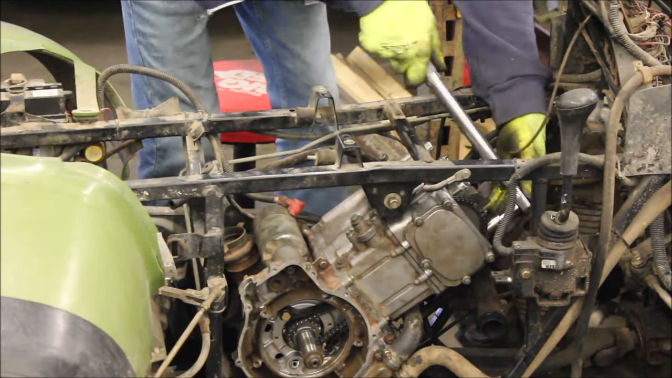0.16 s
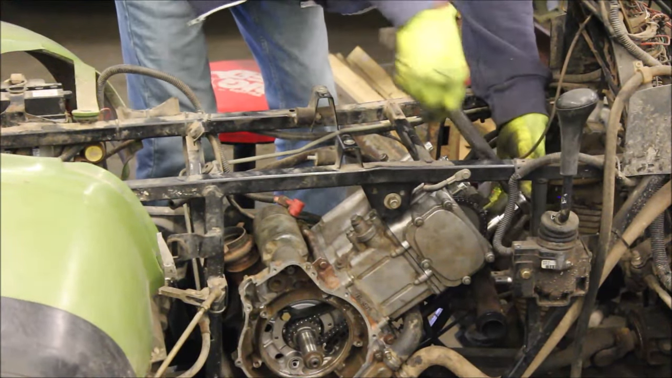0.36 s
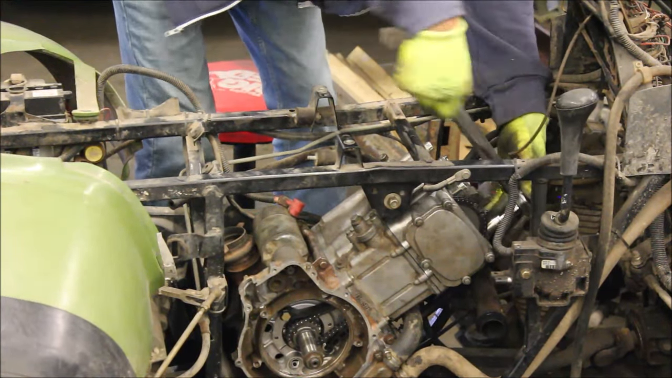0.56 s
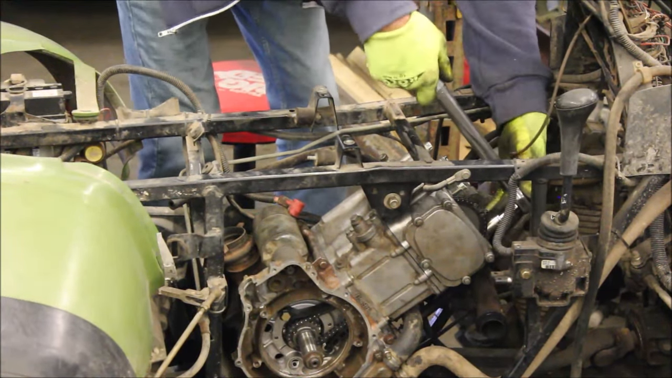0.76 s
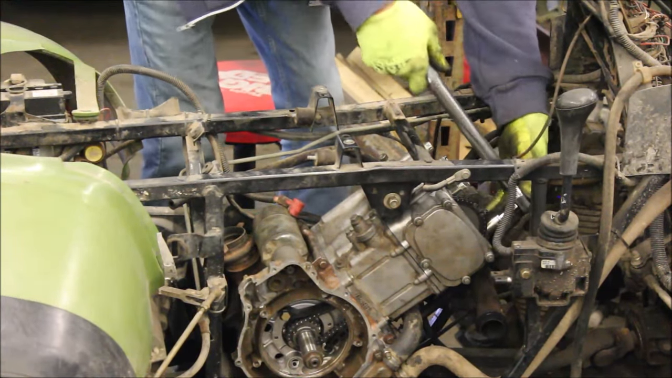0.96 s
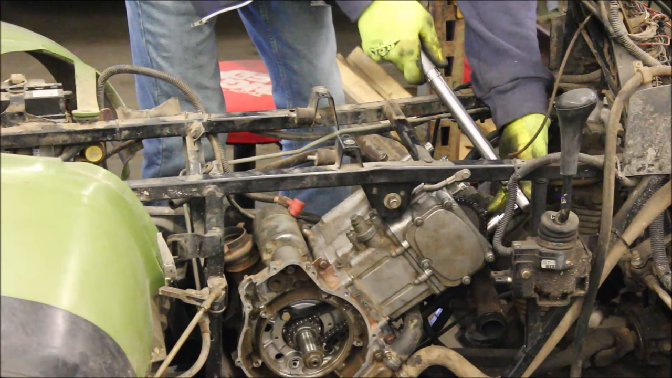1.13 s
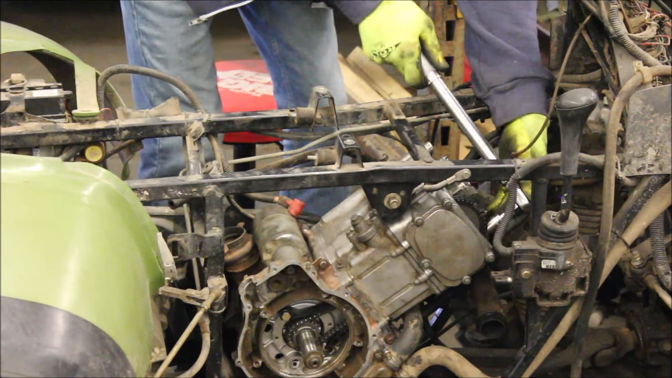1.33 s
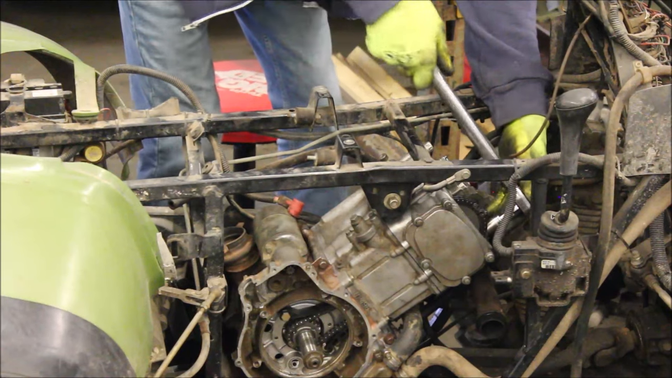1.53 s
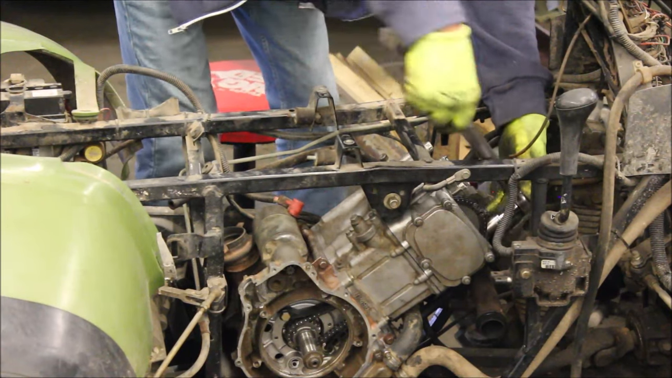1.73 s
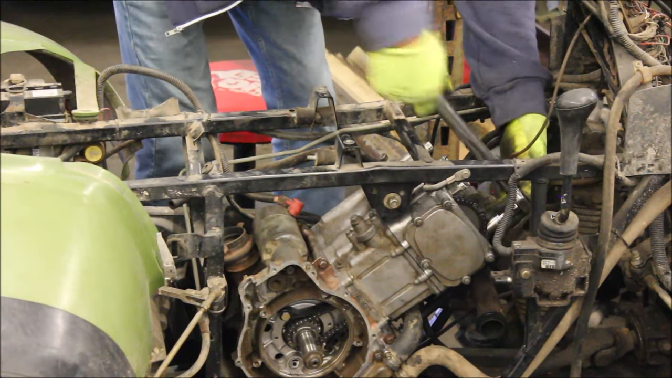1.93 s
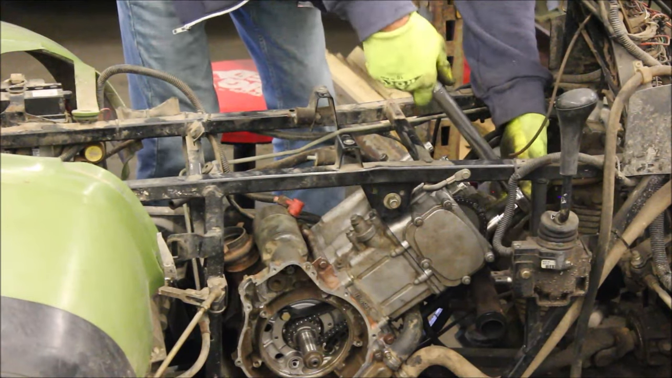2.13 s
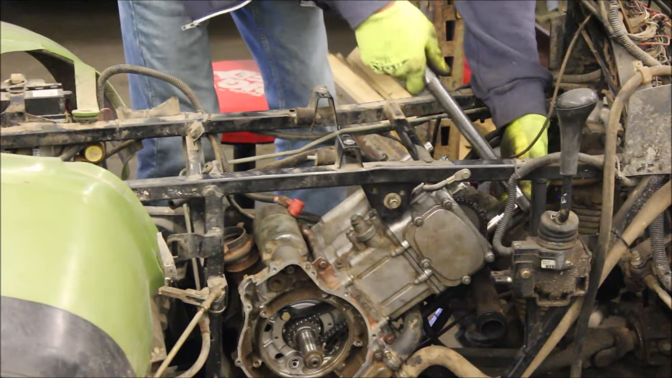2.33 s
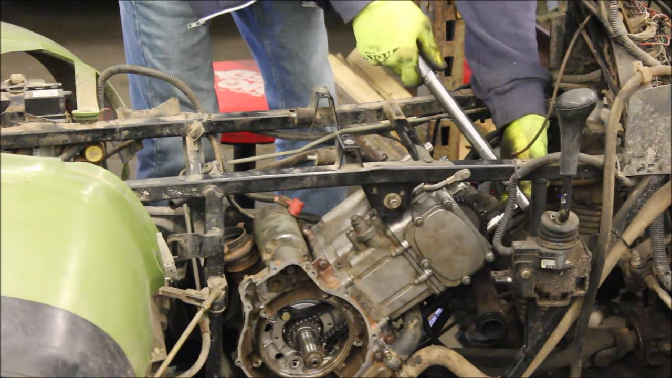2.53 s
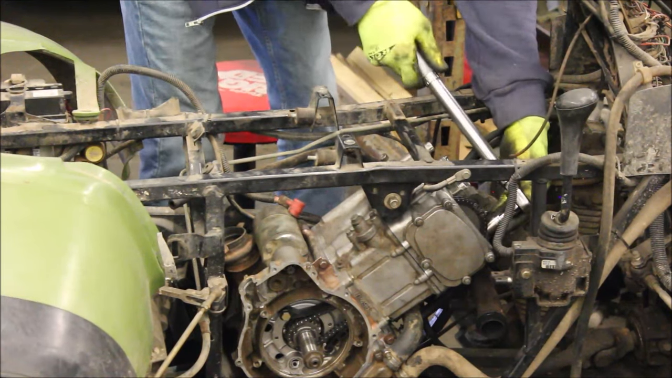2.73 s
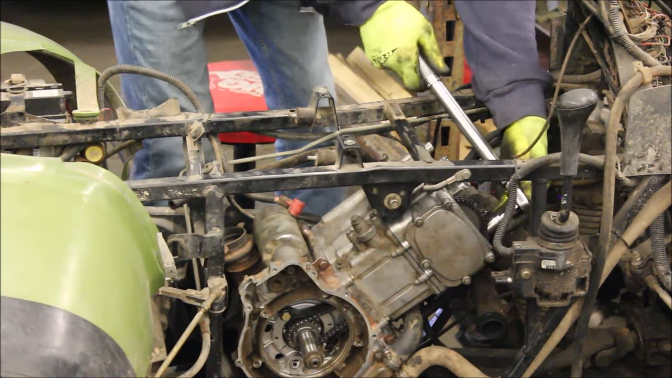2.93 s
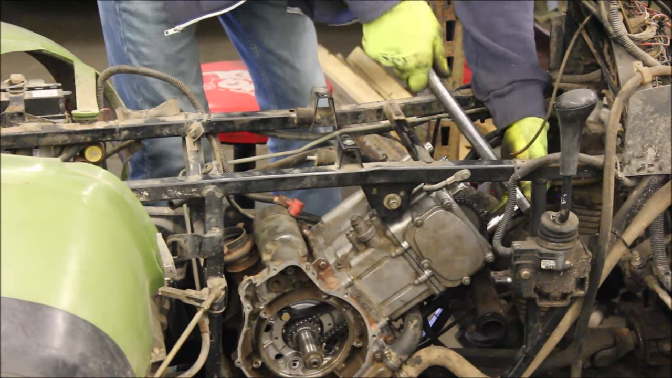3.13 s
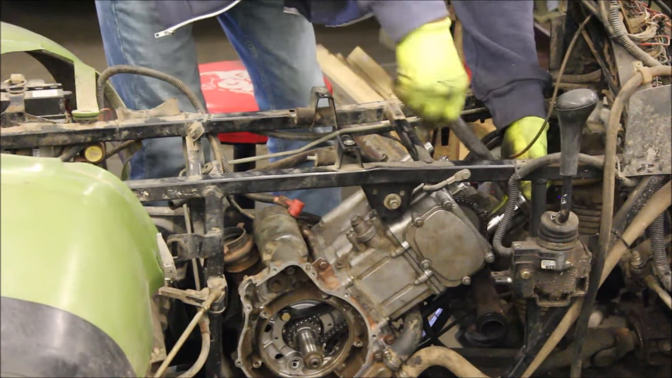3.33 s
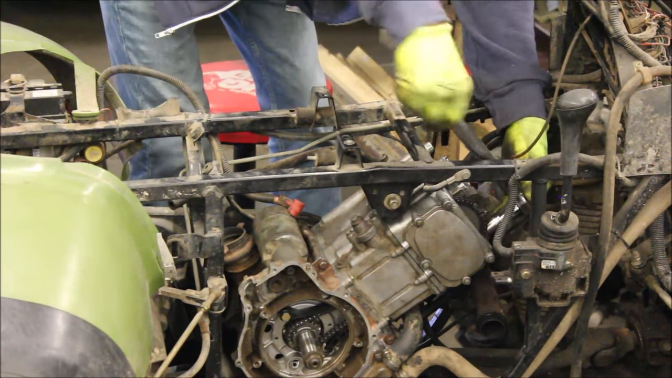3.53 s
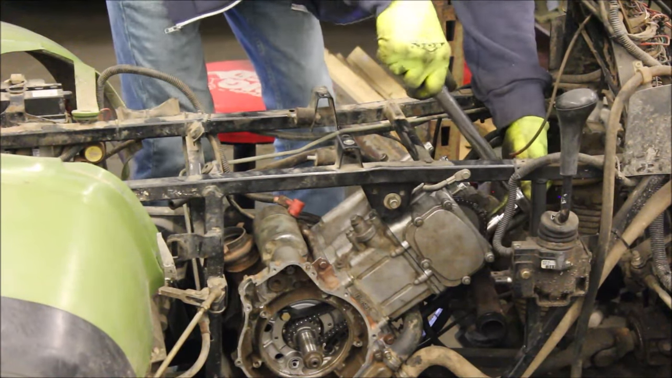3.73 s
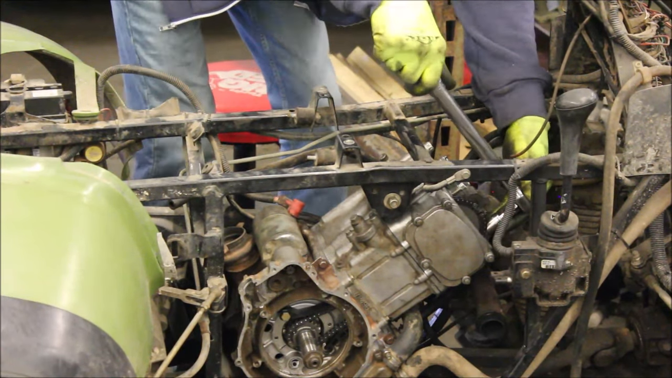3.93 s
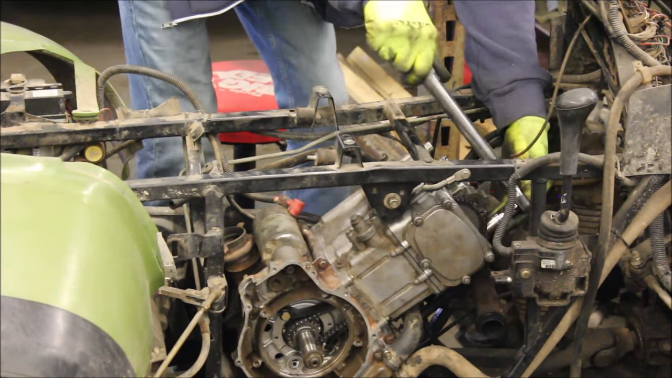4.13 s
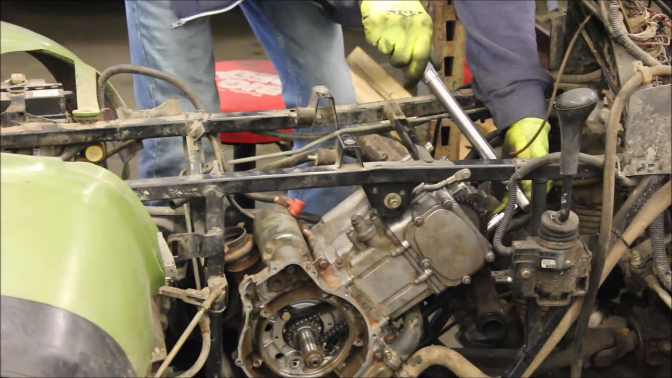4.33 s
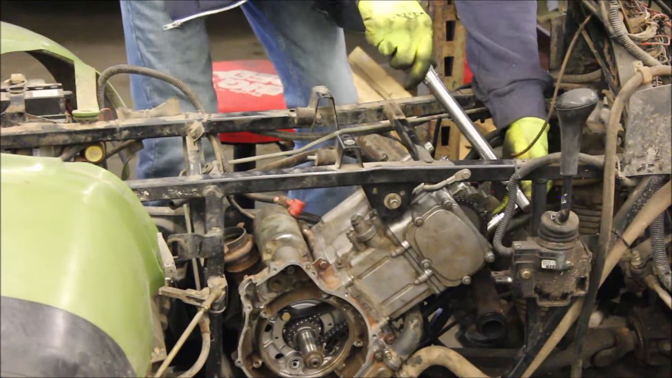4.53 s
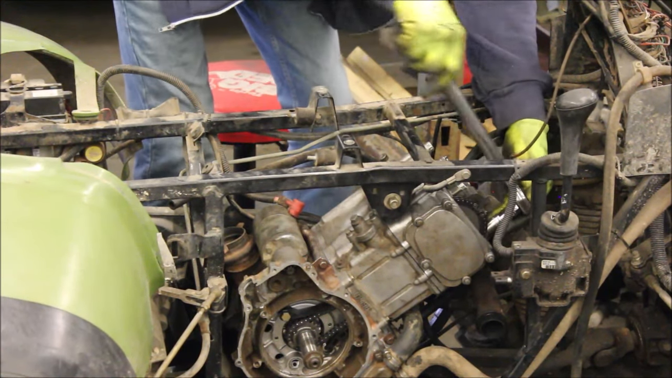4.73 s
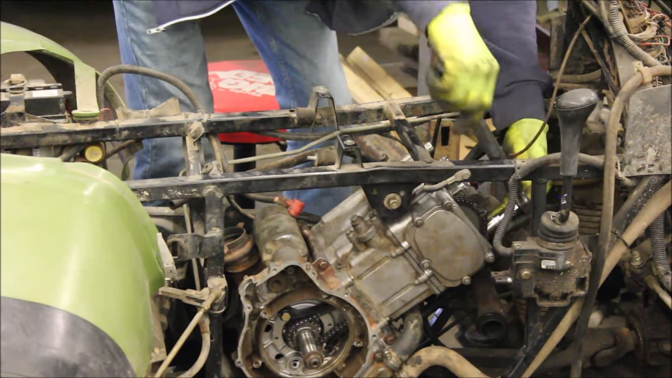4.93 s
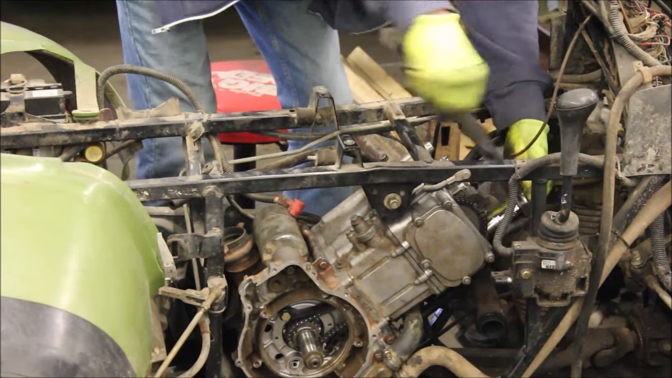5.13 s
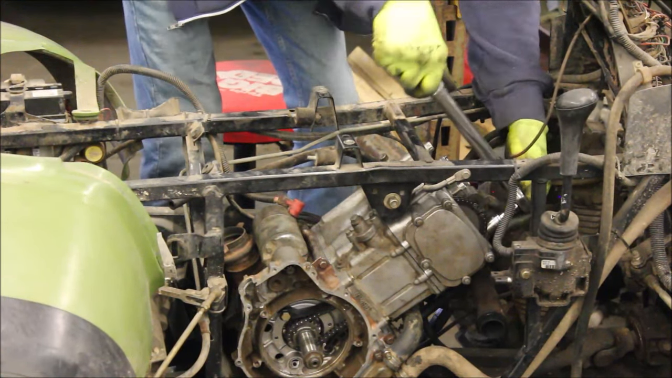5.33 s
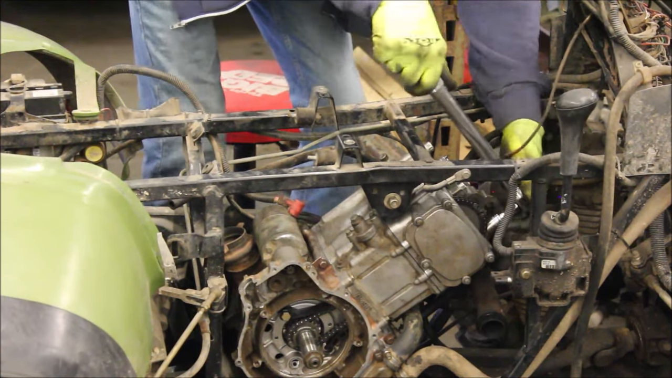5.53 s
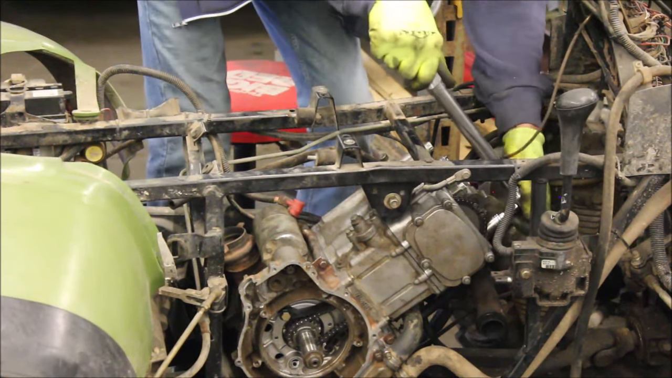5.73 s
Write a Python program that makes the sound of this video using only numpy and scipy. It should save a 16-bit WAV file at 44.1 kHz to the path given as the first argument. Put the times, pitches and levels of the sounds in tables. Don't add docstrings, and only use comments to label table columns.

```python
import sys
import numpy as np
from scipy import signal
from scipy.fft import rfft, irfft
from scipy.io import wavfile
from scipy.ndimage import uniform_filter1d

SR = 44100
rng = np.random.default_rng(int(sys.argv[2]) if len(sys.argv) > 2 else 0)


def level_to_linear(level):
    exponent = np.asarray(level, float) / 20
    return 10 ** exponent


def bounce(signal):
    frames = np.transpose(np.atleast_2d(signal))
    limited = np.clip(frames, -1, 1)
    pcm = np.round(limited * 32767).astype(np.int16)
    wavfile.write(sys.argv[1], SR, pcm)


N = 258867

# freq_hz, level_db, t60_s
SOCKET_MODES = [(835, -7.5, 0.041), (1416, 7, 0.04), (1705, 1.5, 0.043), (2510, -2, 0.087),
                (2770, -3, 0.062), (3740, 8, 0.0063), (5000, -8, 0.033), (10100, -8.5, 0.026)]


def break_over():
    # ring_hz, ring_hz
    blows = [
        (.4671, -2.5, -27, 1560, 868),
        (1.7858, -4.5, -26.5, 2260, 1254),
        (3.4655, -5.5, -27, 1800, 1123),
        (5.0132, -5, -28.5, 1840, 1142),
    ]
    # freq_hz, level_db, t60_s
    modes = [(230.3, -1.5, 0.15), (341, -2.5, 0.3), (392.6, 7, 0.22), (497.7, -2.5, 0.15), (704, 4, 0.17),
             (1170, 8.5, 0.028), (1740, -19, 0.046), (2280, 4.5, 0.02), (2650, -13, 0.093),
             (3400, -5, 0.16), (3770, -2.5, 0.082), (4950, -8, 0.056), (7550, -7.5, 0.027)]
    # freq_hz, density_db (per Hz)
    crack = [(40, -69), (100, -15.5), (180, -13), (290, -6), (600, -6), (880, -10.5), (1360, -9),
             (1950, -0.5), (3300, -9.5), (4300, -15.5), (5650, -23), (10200, -31), (13500, -43),
             (16000, -66)]
    return strikes(blows, modes, crack, ring_db=-2.5, own_db=2.0, own_t60=0.087,
                   rise_s=0.013, rush_s=0.032, slack_db=-31, lead_s=0.001071)


def ratchet():
    # start_s, peak_db, treble_minus_body_db, ring_hz, ring_hz
    ticks = [(0.2708, -22, -13, 3740, 7050), (0.3081, -24.5, -15, 3700, 4940),
             (0.3491, -25, -13, 3740, 5170), (0.4048, -26, -13, 3100, 7100), (0.453, -26, -7, 1950, 5340),
             (1.5989, -24, -15.5, 4380, 6700), (1.6416, -23.5, -18.5, 3640, 6200),
             (1.6806, -23.5, -3, 4080, 6650), (1.727, -24, -13, 4340, 5000), (1.7754, -25, -2, 2250, 4600),
             (3.2096, -22.5, -8.5, 3800, 4600), (3.259, -24, -11.5, 2730, 4570),
             (3.3118, -24.5, -5.5, 2730, 4660), (3.3699, -22, -5.5, 2590, 6700),
             (4.8367, -25.5, -13.5, 2900, 7350), (4.8997, -26.5, -15.5, 3140, 6470),
             (4.9835, -25.5, -21, 2650, 4440)]
    # freq_hz, level_db, t60_s
    modes = [(7070, 3, 0.0074), (10300, 1, .006), (11860, -20, 0.005)]
    # freq_hz, density_db (per Hz)
    crack = [(410, -63), (700, -25.5), (2000, -12), (3000, -11), (4200, -7.5), (5500, -12.5), (7200, -12.5),
             (9000, -18.5), (11000, -17.5), (16000, -36)]
    bounce_s, bounce_db = 0.0115, -5.5
    sound = strikes(ticks, modes, crack, ring_db=-3, own_db=4.5, own_t60=0.012,
                    rise_s=0.0012, rush_s=0.017, slack_db=-17.5, lead_s=0.0004)
    add(sound, bounce_s, level_to_linear(bounce_db) * sound)
    return sound


def latch_reset():
    # start_s, peak_db, treble_minus_body_db, ring_hz
    snaps = [
        (0.681, -20, -14, 3300),
        (0.6963, -23, -3, 5820),
        (0.7079, -26.5, -49, 3070),
        (1.997, -22, -19, 2640),
        (2.0125, -28.5, -6, 3530),
        (3.6755, -25, -8, 5600),
        (5.2834, -19, -12.5, 3120),
        (5.2905, -33, -10, 3390),
    ]
    # freq_hz, level_db, t60_s
    modes = [(3200, -11, .012), (4700, 8, 0.0034), (7340, 7.5, 0.0048), (10350, 1.5, 0.0089)]
    # freq_hz, density_db (per Hz)
    crack = [(410, -39), (700, -5.5), (1460, -4), (2660, -1.5), (4610, -4), (5990, -12), (11200, -23),
             (16000, -40)]
    return strikes(snaps, modes, crack, ring_db=-10.0, own_db=8.0, own_t60=0.018,
                   rise_s=0.00052, rush_s=0.043, slack_db=-20, lead_s=0.0005)


def socket_seat():
    # start_s, peak_db, treble_minus_body_db
    seats = [
        (0.1516, -31.5, -10),
        (1.4571, -31.5, -16),
        (3.0634, -34, -13),
        (4.6448, -33.5, -15),
    ]
    # freq_hz, density_db (per Hz)
    crack = [(290, -56), (500, -28), (796, 7), (1160, -14), (1410, -2), (1870, 2), (3820, -10.5),
             (12000, -43), (15600, -66), (22000, -120)]
    return strikes(seats, SOCKET_MODES, crack, ring_db=9, own_db=-5, own_t60=0.03,
                   rise_s=0.00044, rush_s=0.038, slack_db=-35, lead_s=0.0005)


def shuffle():
    # start_s, peak_db, treble_minus_body_db, ring_hz
    nudges = [(0.127, -37, -11, 1440), (1.434, -46, -10, 1380), (2.695, -37.5, -28, 1270),
              (2.807, -41.5, -26, 713), (3.042, -38, -23, 813), (3.138, -40.5, -14, 7200),
              (4.151, -40.5, -15, 2280), (4.197, -39.5, -14, 1280), (4.236, -34.5, -19, 1270),
              (4.298, -42, -40, 1280), (4.411, -43.5, -27, 1010)]
    # freq_hz, density_db (per Hz)
    crack = [(180, -10), (300, -1), (867, -3), (1250, -0.5), (1910, -7), (3040, -7.5), (14000, -33.5)]
    return strikes(nudges, SOCKET_MODES, crack, ring_db=-12, own_db=17.0, own_t60=0.015,
                   rise_s=0.0041, rush_s=0.096, slack_db=-30, lead_s=0.00073)


def strikes(rows, modes, crack, ring_db, own_db, own_t60, rise_s, rush_s, slack_db, lead_s):
    out, hz = np.zeros(N), np.fft.rfftfreq(8192, 1 / SR)
    lag_s, lag_hz = 0.009005, 449
    lag = np.exp(-2j * np.pi * lag_s * lag_hz * np.arctan(hz / lag_hz))
    usual_db = np.mean([row[2] for row in rows])
    crack_power = power(level_to_linear(read(crack, hz)))
    for s, peak_db, treble_db, *own_hz in rows:
        all_modes = modes + [(own, own_db, own_t60) for own in own_hz]
        f, db, t60 = (column[:, None] for column in np.transpose(all_modes))
        resonances = level_to_linear(2 * db) / ((hz - f) ** 2 + (0.94 / t60) ** 2) ** 0.84
        ring = np.sqrt(resonances.sum(0))
        ring *= hz ** 2 / (hz ** 2 + 150 ** 2)
        body = crack_power + level_to_linear(2 * ring_db) * power(ring)
        body *= (hz / 3000 + 0.042) ** (0.1 * (treble_db - usual_db))
        click = causal(10 * np.log10(body / body.mean() + 1e-12))
        sound = level_to_linear(peak_db + 15.5) * irfft(rfft(click) * lag * rattle(rise_s, rush_s))
        add(out, s - lead_s, sound)
        add(out, s - lead_s - 0.004, level_to_linear(slack_db) * sound)
    return out


def rattle(rise_s, t60, size=8192):
    t = np.arange(size) / SR
    shape = (1.12 - np.exp(-t / rise_s)) * level_to_linear(-60 * (t / t60) ** 1.5)
    burst = rng.standard_normal(size) * shape
    for _ in range(8):
        burst = irfft(np.exp(1j * np.angle(rfft(burst))))
        burst *= shape / np.sqrt(abs(uniform_filter1d(burst ** 2, size=48)) + 1e-9)
    return rfft(burst / np.linalg.norm(burst))


def causal(db):
    cepstrum = irfft(np.maximum(db, -100) * np.log(10) / 20)
    cepstrum[1:len(db) - 1] *= 2
    cepstrum[len(db):] = 0
    return irfft(np.exp(rfft(cepstrum)))


def power(spectrum):
    return abs(spectrum) ** 2 / np.sum(abs(spectrum) ** 2)


def read(points, hz):
    f, value = np.transpose(points)
    return np.interp(np.log(hz + 1), np.log(f + 1), value)


def add(mix, s, sound):
    part = mix[round(s * SR):][:len(sound)]
    part += sound[:len(part)]


def garage(x, wet_db, near_db, build_s):
    # freq_hz, t60_s
    decay = [(120, 1.5), (300, 1.06), (700, 1.06), (1500, 1.08), (2500, 1.08), (4000, 1.03), (7000, 0.74),
             (11000, 0.46), (16000, 0.31)]
    # delay_s, left_db, right_db
    echoes = [(.0112, -13.5, -12.5), (.0128, -9, -15.5), (.0173, -17, -16.5), (.0305, -44, -56),
              (.037, -12, -13)]
    # freq_hz, side_minus_mid_db
    spread = [(60, -48), (130, -31), (290, -25), (640, -14.5), (1410, -9.5), (3100, -6), (6820, -3),
              (15000, 3)]
    tail = pair_noise(520, 512, spread, lambda hz, t: -60 * t / read(decay, hz))
    t = np.arange(tail.shape[1]) / SR
    tail *= 1 - np.exp(-(t / build_s) ** 2)
    tail *= 1 + level_to_linear(near_db - 60 * t / 0.59)
    tail *= level_to_linear(wet_db) / np.linalg.norm(tail, axis=1, keepdims=True)
    tail[:, 0] += 1
    for k, (delay, *db) in enumerate(echoes):
        right_shift = k % 3 - 1
        tail[:, round(delay * SR) + np.array([0, right_shift])] += np.diag(level_to_linear(np.array(db)))
    return signal.fftconvolve(x[None], tail, axes=1)[:, :N]


def pair_noise(frames, size, width, shape):
    hz = np.fft.rfftfreq(size, 1 / SR)[:, None]
    a, b, c, d = rng.standard_normal((frames, len(hz), 4)).T
    mid, side = a + 1j * b, level_to_linear(read(width, hz)) * (c + 1j * d)
    t = np.arange(frames) * size / 4 / SR
    z = np.array([mid + side, mid - side]) * level_to_linear(shape(hz, t))
    return signal.istft(z, nperseg=size, noverlap=size * 3 // 4)[1]


def lamps():
    # freq_hz, level_db, width_hz, beat_depth_db
    hum = [(65, -67.5, 1.8, -1), (119, -61.5, 2.11, 1.5), (266, -74, 2, 1.5), (358, -62, 8, -0.3),
           (607, -70.5, 4.9, 3.5), (856, -74, 2.6, 1.2)]
    beat_s, beat_top_s = 2.37, 2.9
    t, out = np.arange(N) / SR, np.zeros(N)
    beat = np.cos(2 * np.pi * (t - beat_top_s) / beat_s)
    for hz, db, width, depth_db in hum:
        waver = sum(np.exp(2j * np.pi * (width * rng.uniform(-0.8, 1) * t + rng.random()))
                    for _ in range(6))
        tone = ((1 + 0.22 * waver) * np.exp(2j * np.pi * hz * t)).real
        out += level_to_linear(db + depth_db * beat) * tone
    return out


def wash():
    # freq_hz, density_db (per Hz)
    spectrum = [(12, -42), (20, -12), (91, -5), (123, -10), (204, -10), (241, -7), (357, -9.5),
                (388, -12.5), (590, -13.5), (698, -14.5), (1190, -14.5), (2820, -22.5), (5380, -26),
                (16000, -37)]
    # freq_hz, side_minus_mid_db
    spread = [(60, -11), (150, -2.5), (380, -1), (950, -0.5), (2380, 1.5), (5980, 2), (15000, -0.5)]
    level_db, swell_db, swell_s, swell_top_s = -52.05, 0.77, 3.03, 0.65
    swell = np.cos(2 * np.pi * (np.arange(N) / SR - swell_top_s) / swell_s)
    noise = pair_noise(N // 512 + 5, 2048, spread, lambda hz, t: read(spectrum, hz) + 0 * t)[:, :N]
    noise /= np.sqrt(np.mean(noise ** 2) + 1e-20)
    return level_to_linear(level_db + swell_db * swell) * noise


def scene():
    frame = break_over() + shuffle()
    head = ratchet() + latch_reset() + socket_seat()
    out = garage(frame, wet_db=3.0, near_db=-8, build_s=0.0023)
    out += garage(head, wet_db=0.5, near_db=-19.0, build_s=0.0015)
    return out + wash() + lamps()


def low_pass(x):
    return signal.sosfilt(signal.butter(12, 16480, fs=SR, output="sos"), x)


def record(dry):
    balance_db = np.array([[0.2], [-0.2]])
    edge = signal.firwin(255, 15900, fs=SR)[None]
    mix = signal.oaconvolve(dry * level_to_linear(balance_db), edge, "same")
    return low_pass(mix)


dry = scene()
out = record(dry)
bounce(out)
```